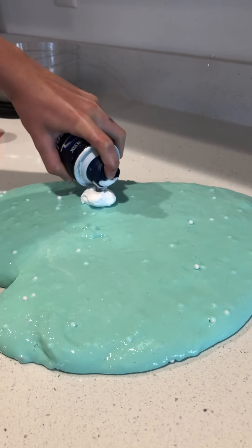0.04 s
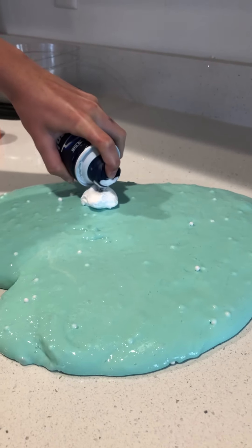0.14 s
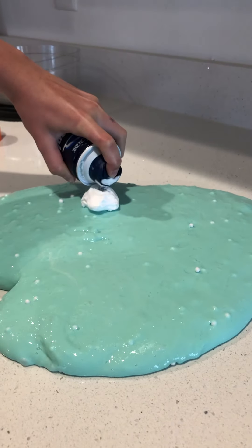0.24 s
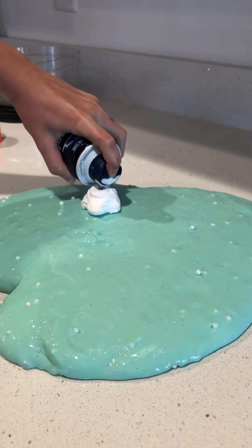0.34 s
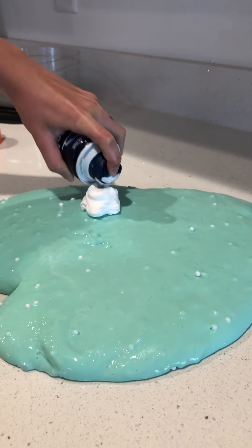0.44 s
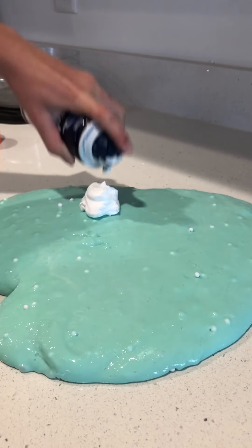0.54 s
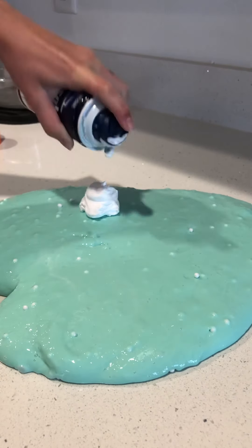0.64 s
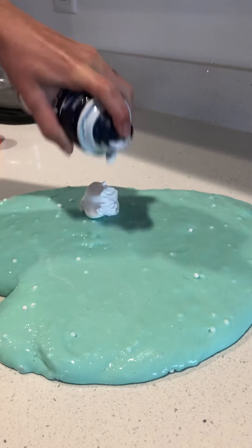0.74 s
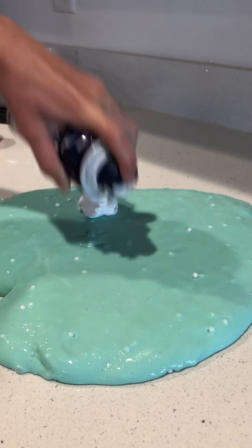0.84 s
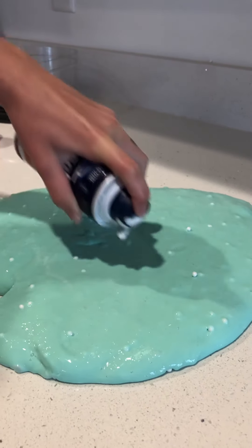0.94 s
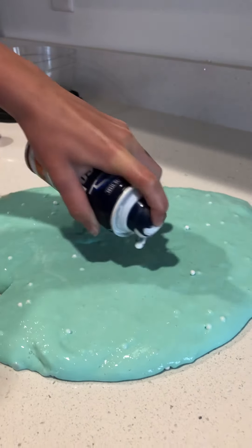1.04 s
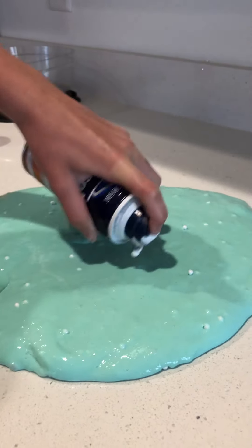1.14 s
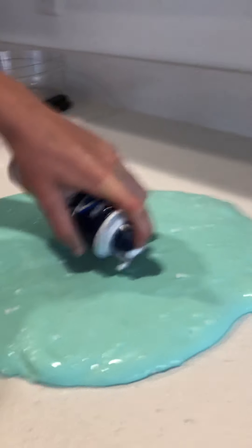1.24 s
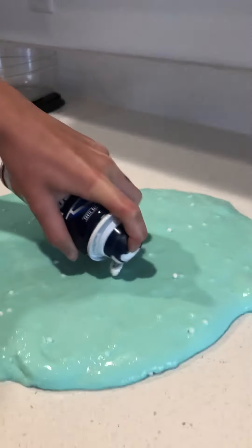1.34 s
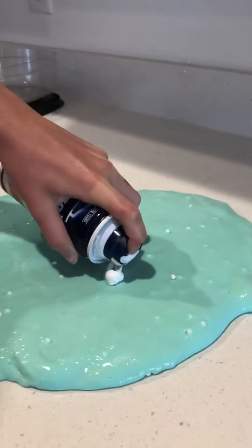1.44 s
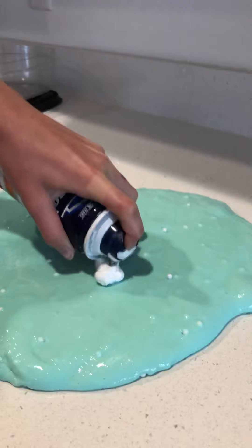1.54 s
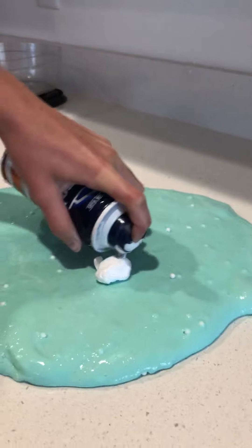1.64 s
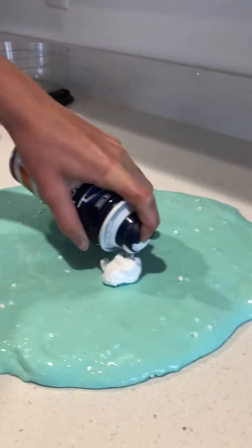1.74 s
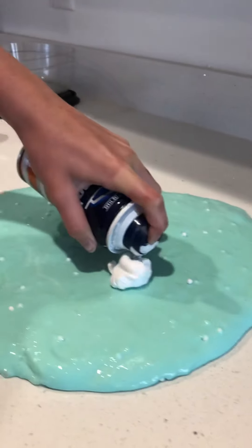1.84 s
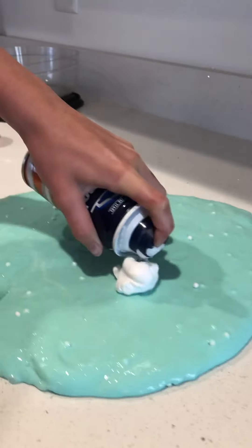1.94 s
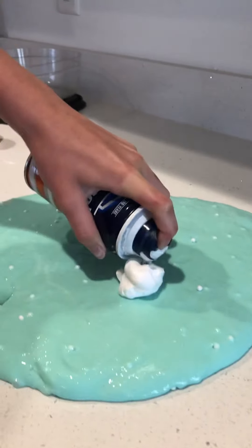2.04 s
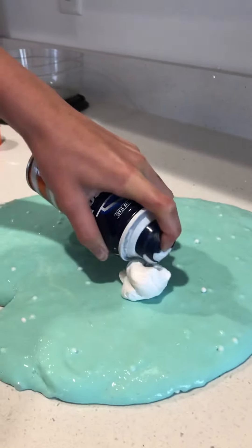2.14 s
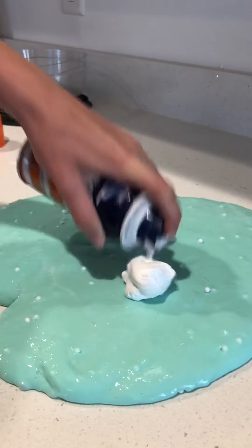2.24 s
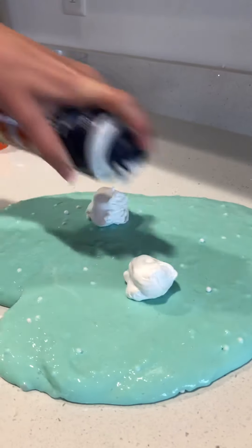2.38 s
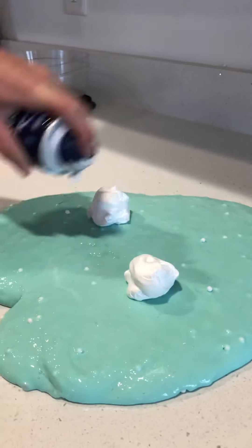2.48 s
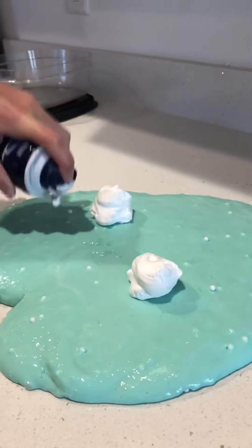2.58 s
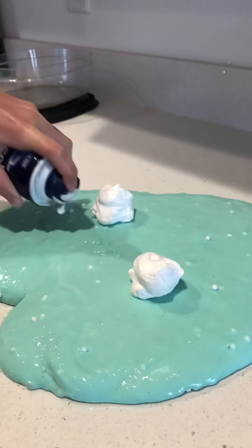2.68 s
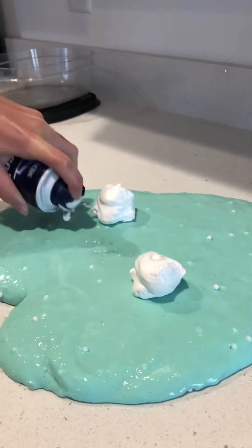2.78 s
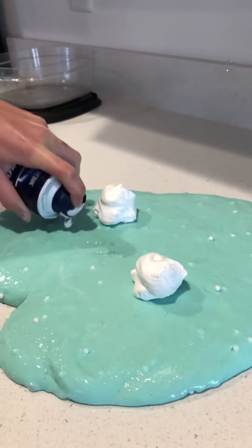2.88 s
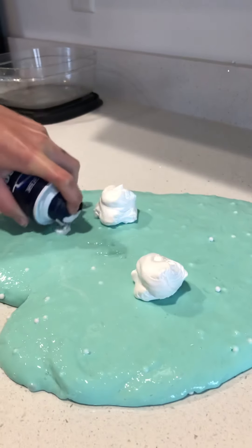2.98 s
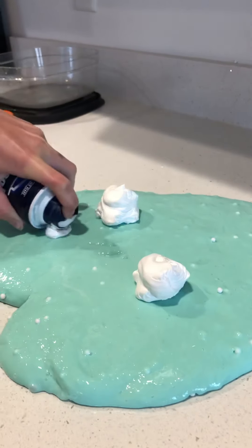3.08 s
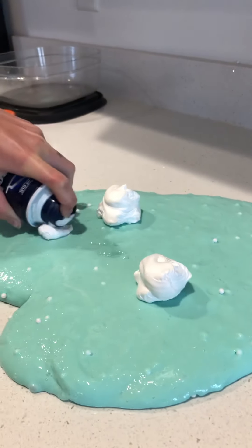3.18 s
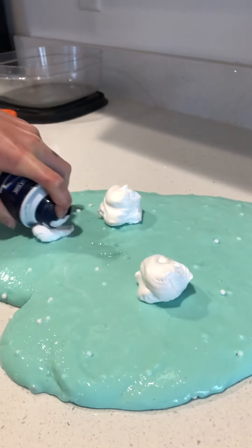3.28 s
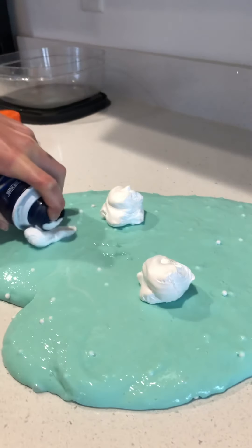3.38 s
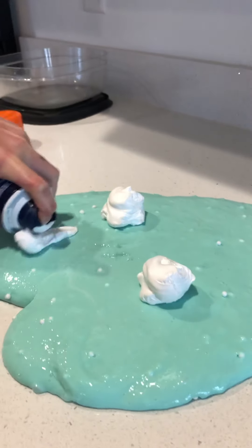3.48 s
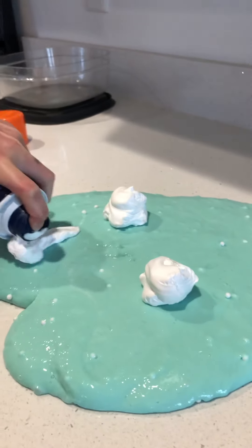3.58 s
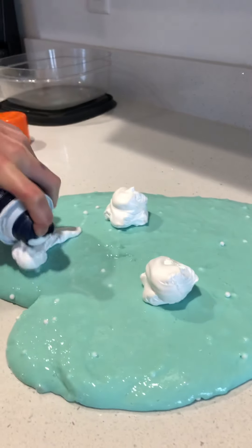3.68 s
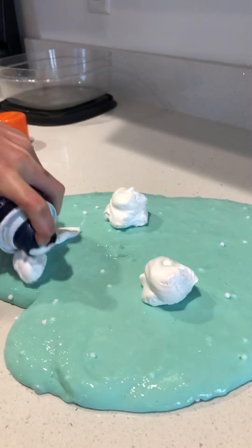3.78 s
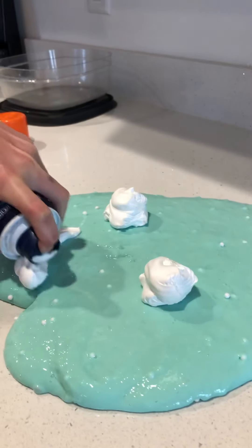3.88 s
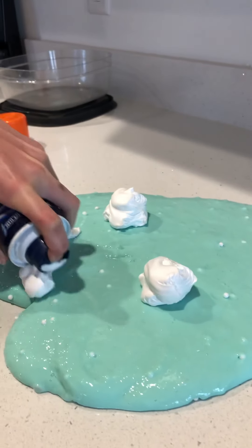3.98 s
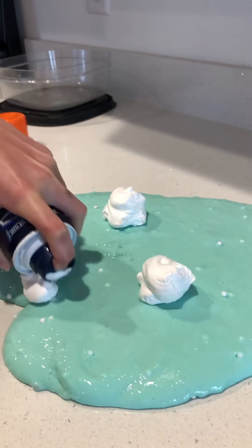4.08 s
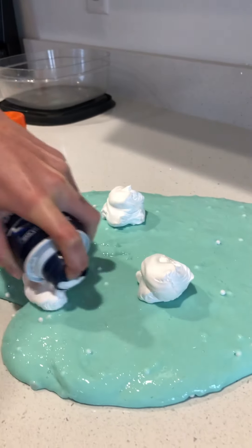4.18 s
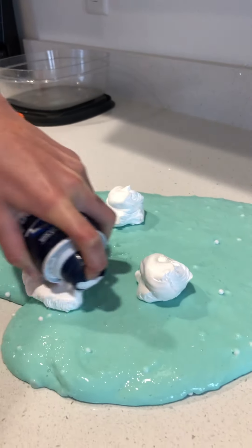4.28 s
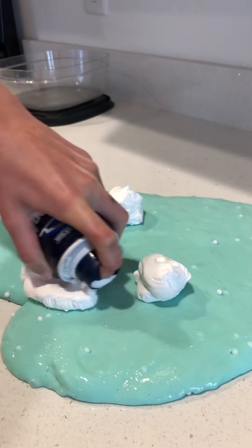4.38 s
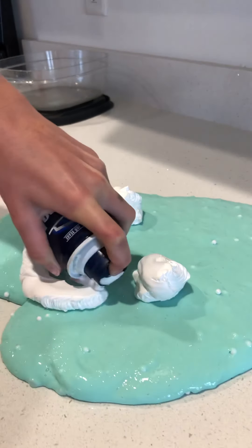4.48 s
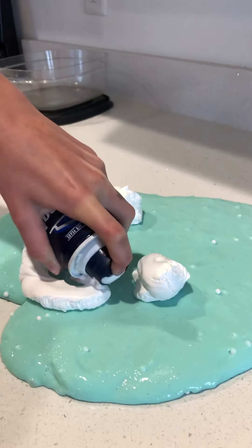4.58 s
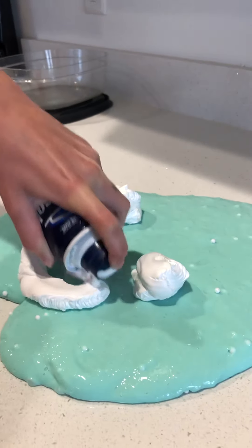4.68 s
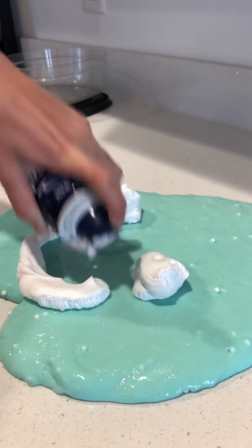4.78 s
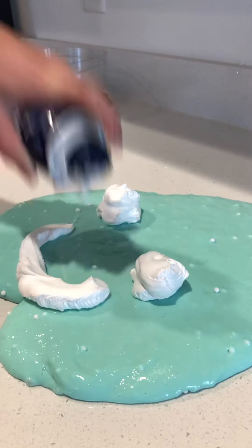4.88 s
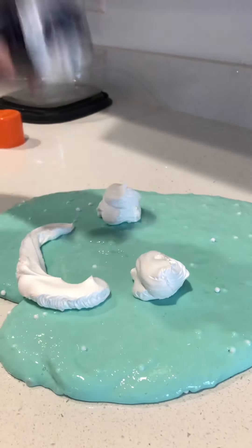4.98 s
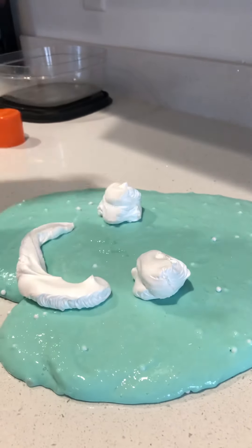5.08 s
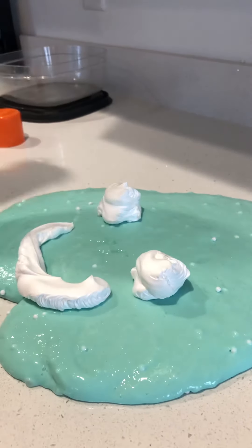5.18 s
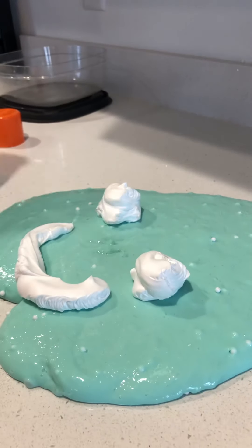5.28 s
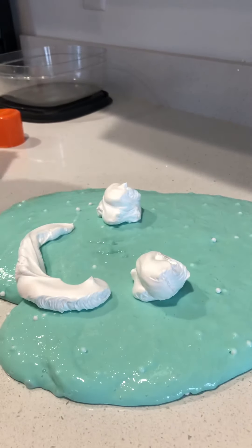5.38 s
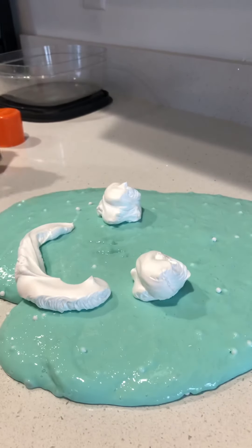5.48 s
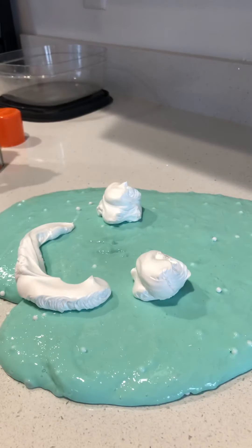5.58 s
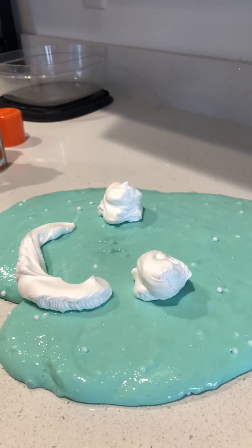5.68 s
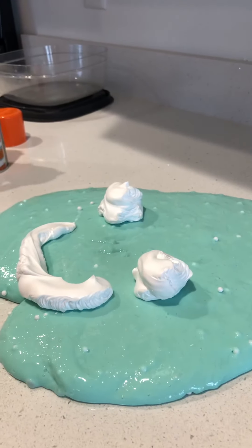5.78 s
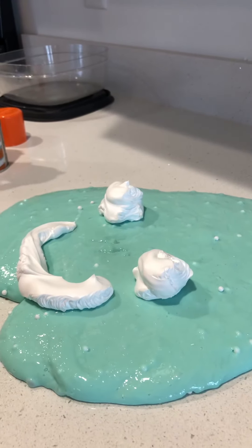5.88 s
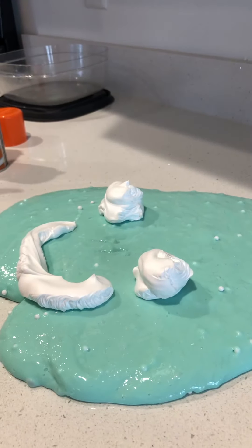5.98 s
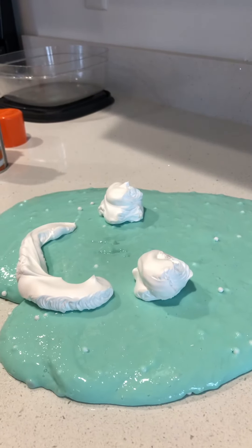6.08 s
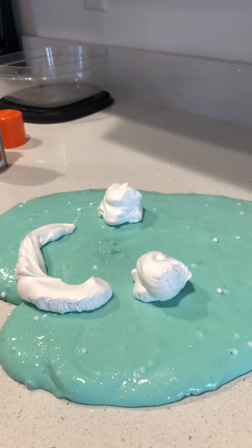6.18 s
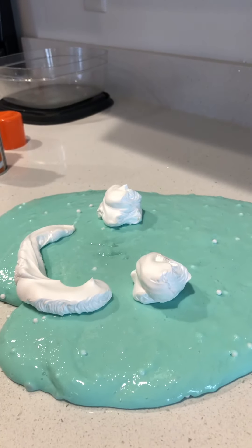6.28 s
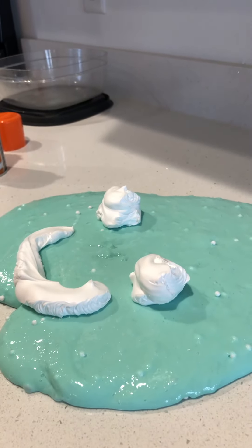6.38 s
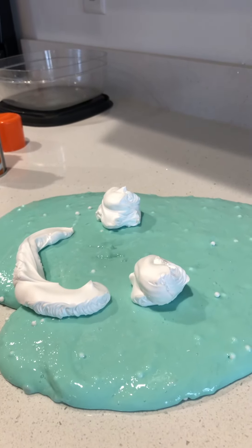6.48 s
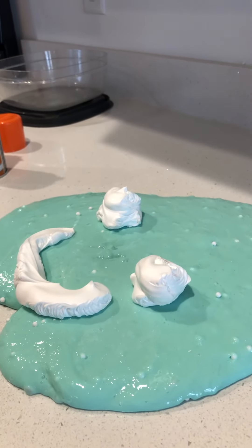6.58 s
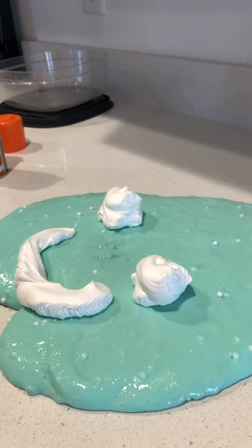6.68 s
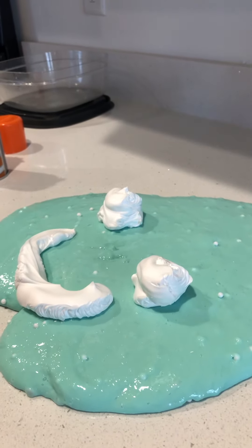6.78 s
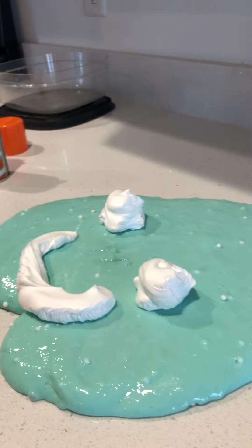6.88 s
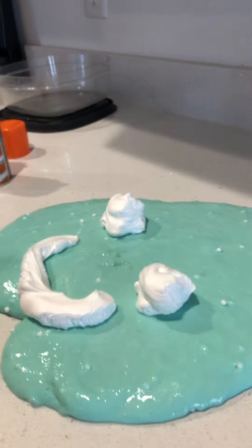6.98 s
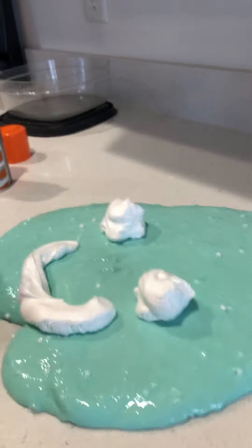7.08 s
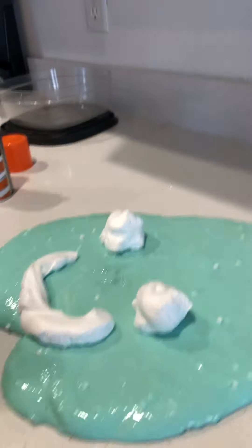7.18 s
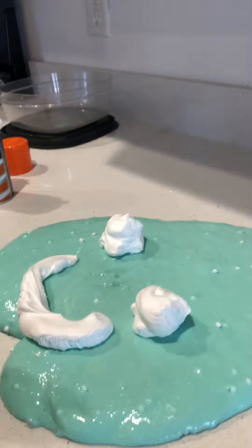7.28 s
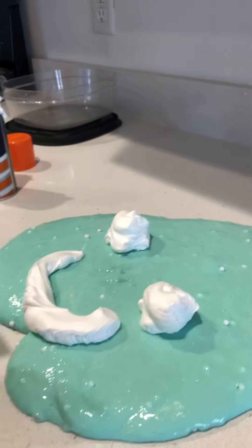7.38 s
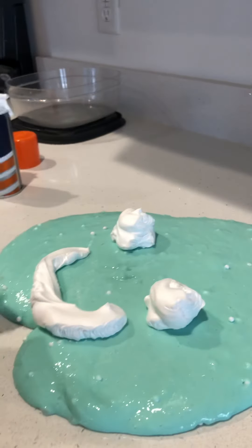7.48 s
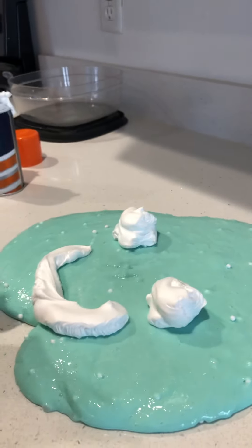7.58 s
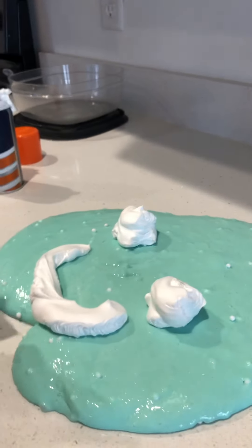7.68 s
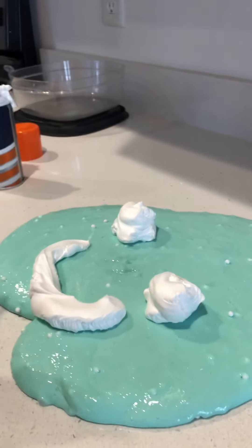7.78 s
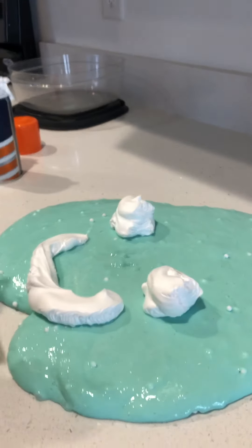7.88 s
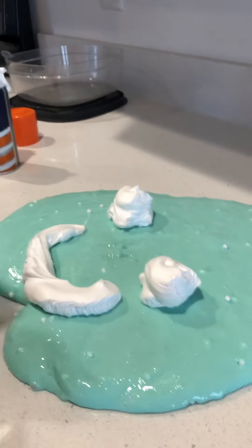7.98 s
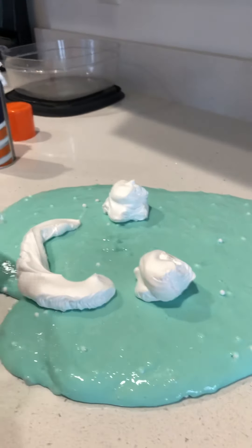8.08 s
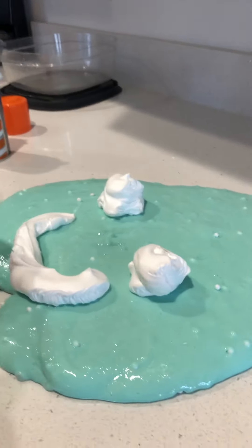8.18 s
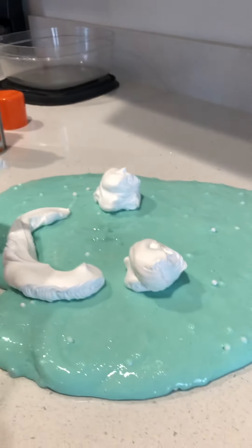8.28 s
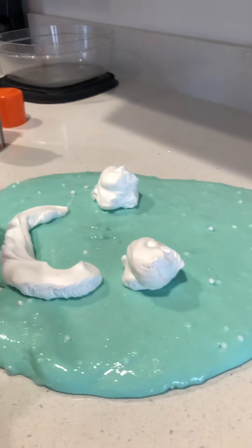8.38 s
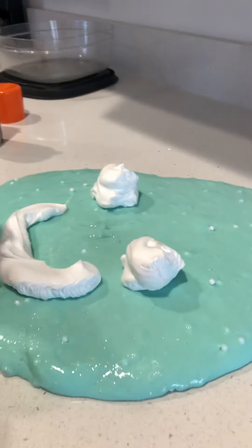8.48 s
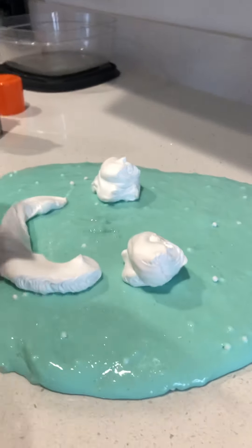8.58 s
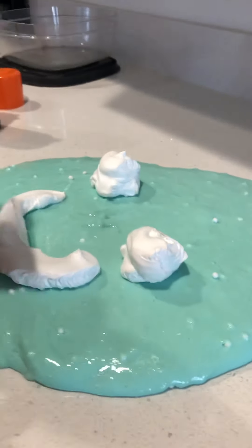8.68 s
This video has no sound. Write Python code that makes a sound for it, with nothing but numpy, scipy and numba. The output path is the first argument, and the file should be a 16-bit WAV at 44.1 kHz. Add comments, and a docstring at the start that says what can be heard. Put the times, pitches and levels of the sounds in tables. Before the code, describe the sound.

Foam gurgles and hisses from a spray can, wet and bubbly with a hollow midrange ring: a short burst, a longer one, then the longest. Pauses hold only faint hum and low bumps. One solid knock marks the can landing on a stone counter, a little further away, with brief room ring. Quiet hand rustles and light taps follow, strongest near the end, around a sticky snap. Close microphone, small hard-surfaced kitchen.

```python
"""Foam sputters in three bursts from an aerosol can onto slime on a kitchen counter, close to the microphone.
Popping gas pockets excite resonances: a hollow whose pitch sinks as foam piles up, and the bore of the spout.
Filtered random clicks make the valve's hiss and the fizz of tiny cells.
A can knock is a dispersed impulse; rubs, sticky ticks, a stick-slip drag and soft taps are filtered clicks.
A diffuse room tail, low bumps, ventilation rumble and an appliance hum of narrow noise bands lie beneath."""
import sys
import numpy as np
from scipy import signal
from scipy.fft import rfft, irfft
from scipy.io import wavfile
from numba import njit

SR = 44100
rng = np.random.default_rng(int(sys.argv[2]) if len(sys.argv) > 2 else 0)


def generate_wav(sig):
    """Save sig (samples, or channels by samples) to the path in sys.argv[1] as 16-bit PCM at SR."""
    pcm = np.round(np.clip(np.atleast_2d(sig).T, -1, 1) * 32767).astype(np.int16)
    wavfile.write(sys.argv[1], SR, pcm)


N = 385434  # length [samples]


def spray():
    """Common modulation: one uneven flow drives sputter, hiss and fizz, so they swell together."""
    sputter_gain, hiss_gain, fizz_gain = flow_gains()
    flow = unit(undb(1.02 * walk(160) + 0.42 * walk(35)))
    pitch_hz, hollow_share = hollow_shape()
    hollow_hz = pitch_hz * np.exp(0.017 * walk(45))
    foam = undb(-0.6) * sputter_gain * foam_sputter(flow, hollow_hz, hollow_share)
    hiss = undb(-2.5) * hiss_gain * valve_hiss(flow)
    fizz = undb(-2.5) * fizz_gain * cell_fizz(flow)
    mix = wall_echo(foam + hiss + fizz, lag_s=.0035, db=-10.5)
    return shimmer(mix, rate=22, patchy_db=1.6) + gas_spits(hollow_hz)


# Spectrum of the popping foam: (frequency [Hz], level [dB])
SPUTTER_SPECTRUM = [(90, -26.5), (250, -17), (400, -5.5), (520, -14.5), (660, -2), (810, 3), (1080, -3.5),
                    (1650, -0.5), (2000, -8), (2400, -14), (2900, -17), (3400, -20), (5000, -28.5),
                    (12000, -64.5)]


def foam_sputter(flow, hollow_hz, hollow_share):
    """Impulsive excitation of cavities: popping gas pockets ring the foam's hollow and the bore of the spout."""
    sputter = unit(ring(flow * pops(rate=2400, spread_db=4), response(SPUTTER_SPECTRUM)))
    hollow = cavity(flow * pops(rate=1300, spread_db=3.5), hollow_hz, width_hz=250)
    bore_hz = held(FOAM_FOLDS, column=4) * np.exp(0.0087 * walk(25))
    bore = cavity(flow * pops(rate=1500, spread_db=3), bore_hz, width_hz=280)
    # dividing by the summed power keeps the level steady as the hollow's share changes
    body = (sputter + hollow_share * hollow) / np.sqrt(1 + hollow_share ** 2)
    return body + undb(held(FOAM_FOLDS, column=5)) * bore


# Each new fold of foam makes a hollow and sets the ring of the spout and its bubbles:
# (time [s], first pitch [Hz], settled pitch [Hz], hollow relative to sputter [dB],
#  bore pitch [Hz], bore ring [dB], bubble pitch [Hz], bubbles relative to hiss [dB])
FOAM_FOLDS = [(0, 1000, 920, 2.5, 1720, -8.5, 4100, -4), (.29, 1360, 1350, -4, 1690, -10, 3850, -3),
              (1.245, 1500, 1200, -8, 2280, -17, 4900, -2), (1.47, 1400, 847, 2, 2190, -17, 4400, -2.5),
              (2.885, 1450, 1250, -6.5, 2640, -17, 4100, -4), (3.12, 1260, 1110, 0.5, 2710, -21, 4400, 0),
              (3.47, 1300, 980, 1.5, 2560, -19, 5050, 1), (3.87, 1270, 1190, -5, 2330, -21, 5150, 0.5)]
FOLD_SETTLE_S = .15


def hollow_shape():
    """Exponential relaxation: the hollow's pitch moves to its settled value as each fold fills."""
    start, first_hz, settled_hz, ring_db = (held(FOAM_FOLDS, column=k) for k in range(4))
    age = np.maximum(np.arange(N) / SR - start, 0)
    pitch_hz = settled_hz + (first_hz - settled_hz) * np.exp(-age / FOLD_SETTLE_S)
    return pitch_hz, undb(ring_db)


# Big gas pockets bursting in the hollow: (time [s], impulse level [dB])
GAS_SPITS = [(.007, -20), (1.632, -24), (1.705, -22), (1.831, -22), (2.088, -18.5), (2.127, -25),
             (2.148, -22), (2.165, -26), (3.5005, -20), (3.535, -20), (3.711, -20), (4.469, -24)]


def gas_spits(hollow_hz):
    """Damped resonance: each large burst gives the hollow one blow, and the wide band makes it die quickly."""
    impulses = blows(GAS_SPITS)
    spits = cavity(impulses, hollow_hz, width_hz=520)
    return spits / np.abs(spits).max() * impulses.max()


# Spectrum of the valve: (frequency [Hz], level [dB])
HISS_SPECTRUM = [(1500, -15), (2700, 5), (3200, 2.5), (3600, 1), (4300, 1.5), (5100, -1), (5800, -4.5),
                 (6700, -10), (9000, -23), (15000, -27)]


def valve_hiss(flow):
    """Shot noise: dense random clicks fuse into a hiss, with bubbles ringing briefly at scattered pitches."""
    hiss = unit(ring(flow * pops(rate=3200, spread_db=3), response(HISS_SPECTRUM)))
    bubble_hz = held(FOAM_FOLDS, column=6) * np.exp(0.0087 * walk(25))
    bubble_hz = bubble_hz * np.exp(0.083 * walk(130))
    bubbles = cavity(flow * pops(rate=1000, spread_db=7.0), bubble_hz, width_hz=930)
    return hiss + undb(held(FOAM_FOLDS, column=7)) * bubbles


# Spectrum of the bursting cells: (frequency [Hz], level [dB])
FIZZ_SPECTRUM = [(4000, -28), (7000, 8), (8800, 4), (10500, -0.5), (13500, -7), (16000, -12)]
# Colour of the treble as the nozzle moves:
# (time [s], fizz centre [Hz], valve hiss change [dB], fizz change [dB])
TREBLE = [(.2, 7000, 0, 1.5), (1.36, 8500, 2, 3), (1.62, 7000, -1, -1.5), (1.87, 8600, -1, -0.5),
          (3.02, 8500, 2, 0), (3.18, 8000, -2, -2.5), (3.48, 7400, 6, 0.5), (3.57, 11800, -2.5, 3),
          (3.85, 11600, -2, 0.5), (4.03, 8600, 0, 0), (4.22, 8100, 3.5, 6), (4.5, 8500, -2.5, -4)]


def cell_fizz(flow):
    """Superposed micro-bursts: clicks with short spatter, plus a broad resonance that moves with the nozzle."""
    spatter = scatter(flow * pops(rate=1200, spread_db=6), decay_s=0.0022, db=4)
    fizz = unit(ring(spatter, response(FIZZ_SPECTRUM)))
    fizz_hz = curve(TREBLE) * np.exp(0.0087 * walk(25))
    return fizz + undb(-4.5) * cavity(flow * pops(rate=2200, spread_db=9), fizz_hz, width_hz=3800)


# Presses of the valve, levels before the trims in spray():
# (start [s], stop [s], sputter rise [s], sputter [dB], sputter trend [dB/s], hiss [dB], fizz [dB])
VALVE_PRESSES = [(-.2, 0.441, 0.033, -32.5, -3.5, -50.5, -69.5), (1.246, 2.167, .044, -34, 2.7, -51.5, -64),
                 (2.899, 4.501, .058, -31.5, -2.5, -54, -66)]
HISS_RISE_S, FIZZ_RISE_S = 0.026, .035
FIZZ_GROWTH_DB_PER_S = 4  # more foam, more bursting cells


def flow_gains():
    """Source envelopes: gains of sputter, hiss and fizz, summed over all presses."""
    sputter = hiss = fizz = 0
    for start, stop, rise_s, sputter_db, trend, hiss_db, fizz_db in VALVE_PRESSES:
        sputter = sputter + press(start, stop, rise_s, sputter_db, trend)
        hiss = hiss + press(start, stop, HISS_RISE_S, hiss_db, 0)
        fizz = fizz + press(start, stop, FIZZ_RISE_S, fizz_db, FIZZ_GROWTH_DB_PER_S)
    hiss_change, fizz_change = (undb(curve(TREBLE, column=k)) for k in range(2, 4))
    return sputter, hiss * hiss_change, fizz * fizz_change


OPENING_DB = -28.5  # the flow starts this far below its settled level
SHUT_DB_PER_S = 1200  # fall once the valve is let go


def press(start, stop, rise_s, db, trend_db_per_s):
    """Exponential onset: the flow settles as the valve opens, drifts while held and dies when it shuts."""
    t = np.arange(N) / SR
    age = np.clip(t - start, 0, stop - start)
    opening_db = OPENING_DB * np.exp(-age / rise_s)
    shut_db = SHUT_DB_PER_S * np.maximum(t - stop, 0)
    return (t >= start) * undb(db + opening_db + trend_db_per_s * age - shut_db)


def wall_echo(x, lag_s, db):
    """Comb filtering: a hard surface nearby adds one reflection, its lag drifting as the hand moves."""
    lag = lag_s * SR * (1 + 0.074 * walk(4))
    i = np.arange(N)
    return (x + undb(db) * np.interp(i - lag, i, x)) / np.sqrt(1 + undb(db) ** 2)


# The can lands: (time [s], impulse level [dB])
CAN_LANDINGS = [(5.5449, -14)]
# Spectrum of can against counter: (frequency [Hz], level [dB])
KNOCK_SPECTRUM = [(50, -15), (130, 0.5), (250, -10.5), (450, -9), (950, -1), (1350, -4), (2200, -9),
                  (2600, -15.5), (3150, -11), (4000, -20), (5600, -25.5), (6900, -36), (11000, -43),
                  (15000, -54)]


def can_knock():
    """Dispersion of bending waves in the stone counter: treble arrives first, the dull body a few ms later."""
    hz = np.fft.rfftfreq(N, 1 / SR)
    travel_s = .004  # delay at 1 kHz; it varies as one over the root of frequency
    bending = np.exp(-4j * np.pi * travel_s * np.sqrt(1000 * hz))
    blow = irfft(rfft(blows(CAN_LANDINGS)) * bending, N)
    return ring(scatter(blow, decay_s=0.0045, db=3.5), response(KNOCK_SPECTRUM))


def handling():
    """Superposition of contact sounds: rubs and ticks share a shifting colour, soft taps stay plain."""
    contact = rubbing() + undb(0.5) * sticky_ticks()
    return shimmer(contact, rate=70, patchy_db=3.0) + undb(2.5) * finger_taps()


# Spectrum of rubbing: (frequency [Hz], level [dB])
RUSTLE_SPECTRUM = [(100, -1), (300, 6.5), (700, 6.5), (1100, 4), (2400, 0.5), (4500, -9.5), (6500, -20),
                   (9000, -26.5), (15000, -30)]


def rubbing():
    """Friction noise: a dense stream of tiny slips, with sparse crackles at wandering pitches."""
    slips = scatter(pops(rate=1800, spread_db=5.0), decay_s=0.0019, db=2.5)
    rustle = unit(ring(slips, response(RUSTLE_SPECTRUM)))
    crackle_hz = np.clip(3200 * np.exp(.35 * walk(110)), 1500, 5000)
    crackles = cavity(pops(rate=260, spread_db=4), crackle_hz, width_hz=4500)
    return (rustle + undb(-11) * crackles) * rub_gain()


# The hand rubs: (start [s], length [s], level [dB])
HAND_RUBS = [(6.115, 0.055, -59), (6.255, 0.056, -58), (6.38, .14, -60), (6.57, .11, -57.5),
             (6.74, 0.043, -63), (7.09, 0.073, -57), (7.19, 0.024, -55.5), (7.445, 0.023, -63),
             (7.69, 0.035, -60), (7.755, .025, -54), (7.812, 0.036, -50.5), (7.892, 0.13, -46.5),
             (8.16, 0.062, -50.5), (8.325, 0.032, -56.5), (8.42, 0.018, -61.5), (8.462, 0.018, -60)]
RUB_ATTACK_S, RUB_RELEASE_S = .014, .028
# between rubs the hand stays in light contact
CONTACT_START_S, CONTACT_STOP_S, CONTACT_DB = 6.11, 8.55, -69


def rub_gain():
    """Power addition of stroke envelopes: each rub starts quickly, holds and fades above the light contact."""
    t = np.arange(N) / SR
    contact = (CONTACT_START_S, CONTACT_STOP_S - CONTACT_START_S, CONTACT_DB)
    power = 0
    for start, length, db in HAND_RUBS + [contact]:
        attack = np.clip((t - start) / RUB_ATTACK_S, 0, 1)
        release = np.exp(-np.clip(t - start - length, 0, 1) / RUB_RELEASE_S)
        power = power + (undb(db) * attack * release) ** 2
    return np.sqrt(power)


# Sticky ticks and snaps, before a 0.5 dB lift: (time [s], impulse level [dB])
STICKY_TICKS = [(6.194, -42.5), (6.2642, -45), (6.617, -44), (6.744, -48.5), (7.1202, -42.5), (7.2634, -44),
                (7.449, -44), (7.4834, -42.5), (7.5318, -43), (7.66, -44), (7.7114, -41), (7.7673, -38),
                (7.8137, -35), (7.821, -36), (7.8928, -18), (7.8975, -24), (8.106, -35.5), (8.123, -31.5),
                (8.1589, -35), (8.5415, -43.5), (8.6488, -46.5)]
# Spectrum of a tick: (frequency [Hz], level [dB])
TICK_SPECTRUM = [(150, -5), (600, 3.5), (1100, 1), (3000, 1.5), (5000, 0), (7000, -9), (10000, -13.5),
                 (15000, -25.5)]


def sticky_ticks():
    """Sudden release of adhesion: each tick or drag slip is an impulse trailing a short spatter."""
    impulses = blows(STICKY_TICKS + drag_slips())
    return ring(scatter(impulses, decay_s=0.0026, db=0), response(TICK_SPECTRUM))


# A sticky surface drags: (start [s], length [s], impulse level of a slip [dB])
STICKY_DRAGS = [(7.908, .088, -27.5), (8.169, .06, -35.5)]
SLIP_PERIOD_S, SLIP_SPREAD_DB = .0098, 1.5
SLIP_JITTER = .2  # spread of the timing [periods]


def drag_slips():
    """Stick-slip oscillation: nearly regular catches during each drag, as (time [s], level [dB]) rows."""
    rows = []
    for start, length, db in STICKY_DRAGS:
        chance = rng.standard_normal(size=(32, 2))
        for k, (late, strong) in enumerate(chance):
            if k * SLIP_PERIOD_S < length:
                slip_s = start + (k + SLIP_JITTER * late) * SLIP_PERIOD_S
                rows.append((slip_s, db + SLIP_SPREAD_DB * strong))
    return rows


# Soft finger taps close to the microphone, before a 2.5 dB lift: (time [s], impulse level [dB])
FINGER_TAPS = [(6.857, -38), (6.8595, -33), (6.981, -40.5), (7.8975, -31), (7.906, -28.5), (7.989, -30.5),
               (8.0155, -33)]
# Spectrum of a tap: (frequency [Hz], level [dB])
TAP_SPECTRUM = [(50, -33), (130, 4.5), (300, -1), (750, -2.5), (1200, -13), (2500, -18), (4000, -33),
                (10000, -55)]


def finger_taps():
    """Soft impact: each tap is the impulse response of a dull spectrum."""
    return ring(blows(FINGER_TAPS), response(TAP_SPECTRUM))


# Dull low bumps through the floor: (time [s], impulse level [dB])
FLOOR_BUMPS = [(2.455, -46), (2.53, -47), (5.905, -40)]
# Spectrum of a bump: (frequency [Hz], level [dB])
BUMP_SPECTRUM = [(20, -25), (45, -3), (65, 8.5), (90, -3), (160, -8), (400, -64)]


def floor_bumps():
    """Structure-borne impact: each bump is an impulse response confined to the lowest frequencies."""
    return ring(blows(FLOOR_BUMPS), response(BUMP_SPECTRUM, size=8192))


# Reverberation of the kitchen: (frequency [Hz], time to fall 60 dB [s])
ROOM_DECAY = [(150, 0.82), (700, 0.57), (2000, 0.67), (4500, 0.48), (7000, 0.54), (14000, .15)]


def room():
    """Diffuse reverberation: noise bands decay exponentially, each with its own reverberation time."""
    t = np.arange(SR) / SR
    hz = np.fft.rfftfreq(SR, 1 / SR)
    noise = rfft(rng.standard_normal(SR))
    edges = np.geomspace(60, 17000, 13)
    tail = 0
    for low, high in zip(edges, edges[1:]):
        band = irfft(noise * (hz >= low) * (hz < high), SR)
        tail = tail + band * undb(-60 * t / at_hz(ROOM_DECAY, np.sqrt(low * high)))
    build_up = np.clip(t / 0.0031, 0, 1)
    tail = signal.lfilter(*signal.butter(1, 6000, fs=SR), tail * build_up)
    # unit rms gain from 500 to 2500 Hz
    return tail / np.sqrt(np.mean(np.abs(rfft(tail)[500:2500]) ** 2))


# Spectrum of the ventilation: (frequency [Hz], level [dB])
AIR_SPECTRUM = [(15, -55), (25, -32), (79, -6), (209, -10.5), (246, -3.5), (297, -11.5), (331, -15),
                (389, -16), (482, -17.5), (567, -22.5), (848, -25.5), (1300, -32), (2420, -37.5),
                (3000, -43), (15500, -54.5)]
AIR_DB = -55
# Appliance hum: (frequency [Hz], half-width [Hz], level [dB])
HUM_BANDS = [(116.3, 2.7, -65.5), (242.2, 5.8, -62.5), (272, 36, -60.5), (2350, 65, -86.5)]


def background():
    """Stationary noise: broadband ventilation rumble and narrow bands that waver as an appliance hum."""
    hz = np.fft.rfftfreq(N, 1 / SR)
    air = unit(irfft(rfft(rng.standard_normal(N)) * undb(at_hz(AIR_SPECTRUM, hz)), N))
    mix = air * undb(AIR_DB + .5 * walk(7.5))
    for centre_hz, width_hz, db in HUM_BANDS:
        peak = 1 / (1 + ((hz - centre_hz) / width_hz) ** 2)
        mix = mix + undb(db) * unit(irfft(rfft(rng.standard_normal(N)) * peak, N))
    return mix


def undb(db):
    """Logarithmic level: decibels to amplitude gain."""
    return 10 ** (np.asarray(db) / 20)


def unit(x):
    """Normalisation: scale to rms 1."""
    return x / np.sqrt(np.mean(x ** 2))


def curve(rows, column=1):
    """Linear interpolation: one column of a table, joined by straight lines in time."""
    rows = np.array(rows)
    return np.interp(np.arange(N) / SR, rows[:, 0], rows[:, int(column)])


def held(rows, column):
    """Zero-order hold: each row's value lasts until the next row starts."""
    rows = np.array(rows)
    latest = np.searchsorted(rows[1:, 0], np.arange(N) / SR, side="right")
    return rows[latest, int(column)]


def at_hz(points, hz):
    """Logarithmic pitch scale: read a table along log frequency."""
    f, value = np.transpose(points)
    return np.interp(np.log(hz + 1e-3), np.log(f), value)


def response(points, size=2048):
    """Minimum phase: fold the cepstrum of a spectrum into a causal impulse response, peak 1."""
    log_gain = at_hz(points, np.fft.rfftfreq(size, 1 / SR)) * np.log(10) / 20
    cepstrum = irfft(log_gain)
    cepstrum[1:size // 2] *= 2
    cepstrum[size // 2 + 1:] = 0
    h = irfft(np.exp(rfft(cepstrum)))
    return h / np.abs(h).max()


def ring(x, h):
    """Convolution: pass a sound through an impulse response."""
    return signal.fftconvolve(x, h)[:N]


def walk(rate):
    """Random modulation: interpolated drift with a spread near 1 and `rate` knots per second."""
    knots = rng.standard_normal(int(N / SR * rate) + 2)
    # the factor restores the variance lost between knots
    return np.sqrt(3 / 2) * np.interp(np.arange(N) / SR * rate, np.arange(len(knots)), knots)


def pops(rate, spread_db):
    """Poisson-like process: randomly timed clicks of uneven size and random sign, `rate` per second."""
    size = undb(spread_db * np.minimum(rng.standard_normal(N), 2.3))
    return (rng.random(N) < rate / SR) * size * rng.choice([-1, 1], N)


def blows(rows):
    """Ideal impulses: one single-sample blow for each (time [s], level [dB]) row."""
    x = np.zeros(N)
    for s, db in rows:
        x[int(s * SR)] += undb(db)
    return x


@njit
def resonance(x, hz, width):
    """Second-order resonator: a state-variable band-pass with a moving centre."""
    y, band, low = np.empty(len(x)), 0., 0.
    for i in range(len(x)):
        g, damping = np.tan(np.pi * hz[i] / SR), width / hz[i]
        v = (band + g * (x[i] - low)) / (1 + g * (g + damping))
        band, low, y[i] = 2 * v - band, low + 2 * g * v, damping * v
    return y


def cavity(x, hz, width_hz):
    """Cascaded resonators: two in series make a steep moving resonance, rms 1."""
    once = resonance(x, hz, float(width_hz))
    return unit(resonance(once, hz, float(width_hz)))


def scatter(x, decay_s, db):
    """Exponential energy decay: every click trails its own short, random spatter."""
    keep = np.exp(-1 / (decay_s * SR))
    energy = signal.lfilter([1 - keep], [1, -keep], x ** 2)
    return x + undb(db) * np.sqrt(energy) * rng.standard_normal(N)


def shimmer(x, rate, patchy_db):
    """Independent band modulation: six overlapping octave bands swell and fade on their own."""
    octave = np.log2(np.clip(np.fft.rfftfreq(N, 1 / SR), 400, 12800) / 400)
    spectrum = rfft(x)
    mix = 0
    for k in range(6):
        band = irfft(spectrum * np.maximum(1 - np.abs(octave - k), 0), N)
        mix = mix + band * undb(patchy_db * walk(rate))
    return mix


def scene():
    """Direct and reverberant sound: the can is set down further off, so the room answers it more strongly."""
    foam, knock, hands = spray(), can_knock(), handling()
    knock_outward = ring(blows(CAN_LANDINGS), response(KNOCK_SPECTRUM))
    tail = ring(undb(-10.5) * foam + knock_outward + undb(-10.0) * hands, room())
    return (foam + knock + hands + floor_bumps() + tail + background())[None]


TOP_HZ = 15850


def record(dry):
    """Band limitation: a steep elliptic low-pass removes the highest treble."""
    return signal.sosfilt(signal.ellip(10, .2, 70, TOP_HZ, fs=SR, output="sos"), dry)


dry = scene()
out = record(dry)
generate_wav(out)
```